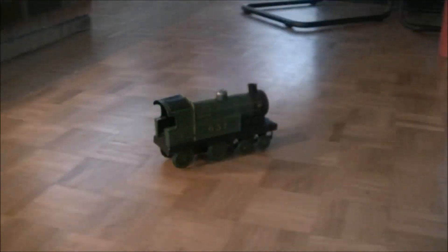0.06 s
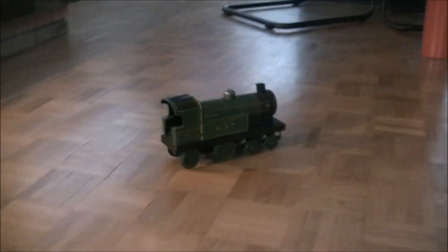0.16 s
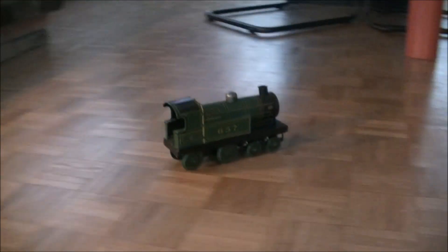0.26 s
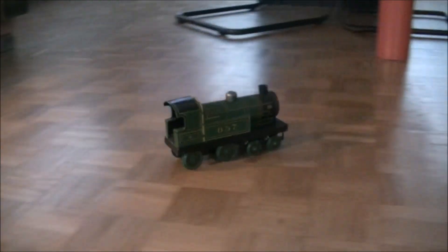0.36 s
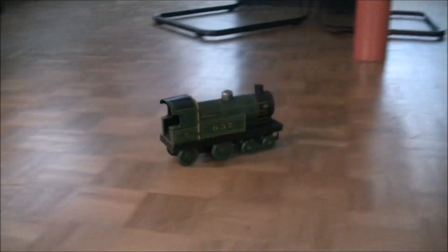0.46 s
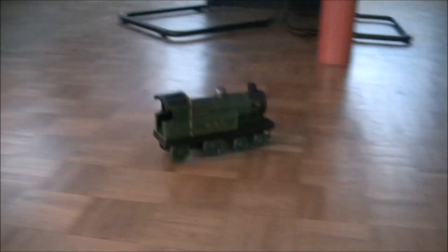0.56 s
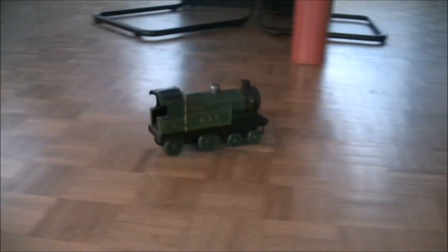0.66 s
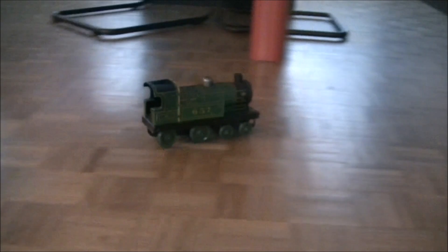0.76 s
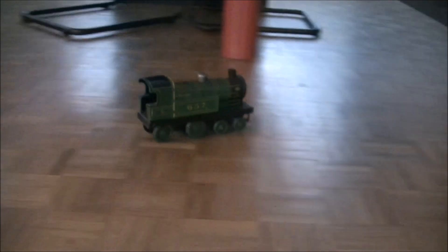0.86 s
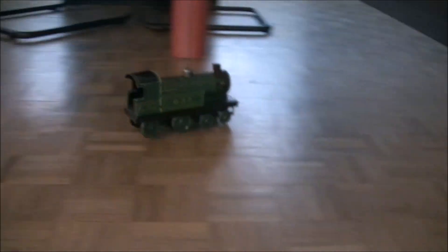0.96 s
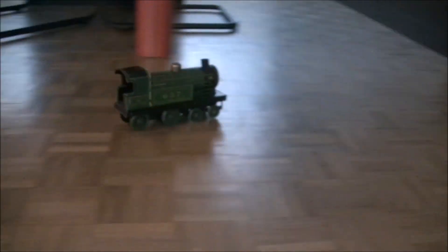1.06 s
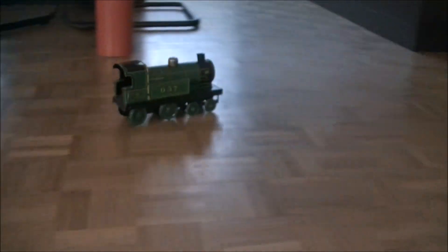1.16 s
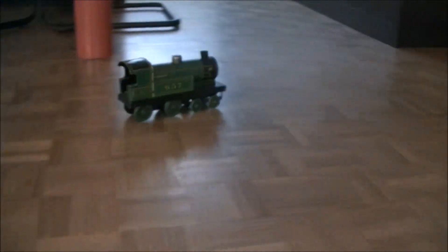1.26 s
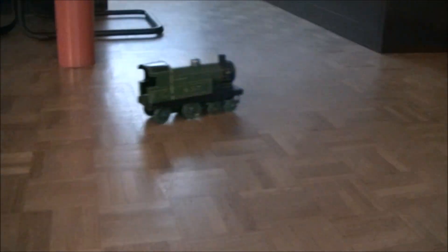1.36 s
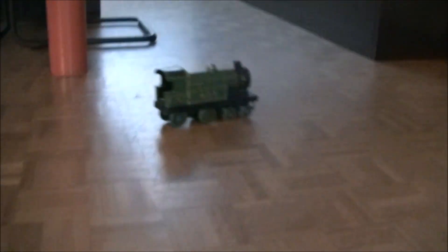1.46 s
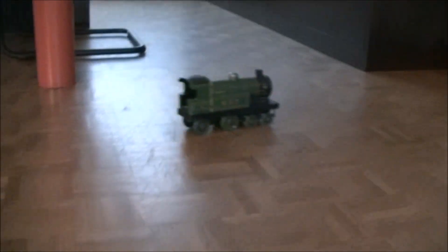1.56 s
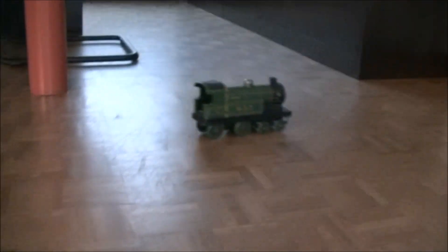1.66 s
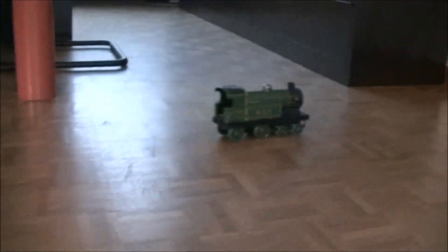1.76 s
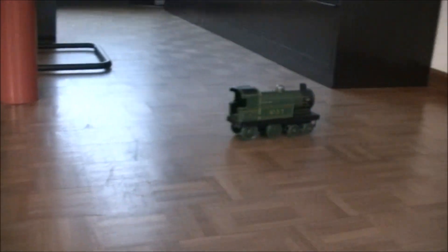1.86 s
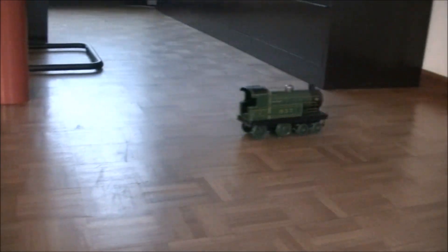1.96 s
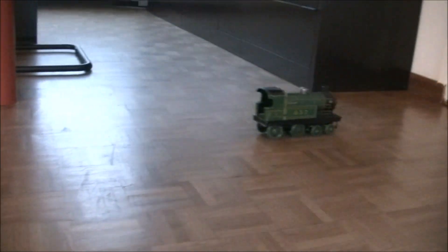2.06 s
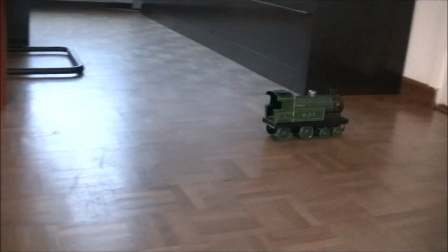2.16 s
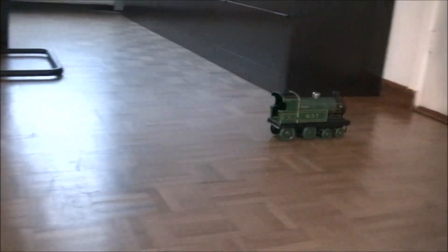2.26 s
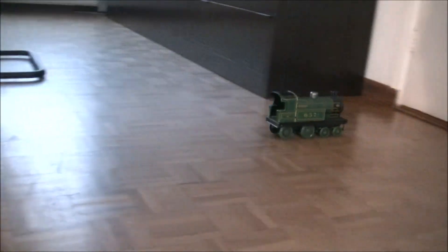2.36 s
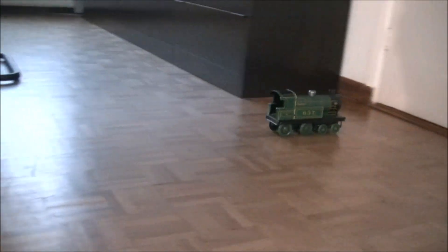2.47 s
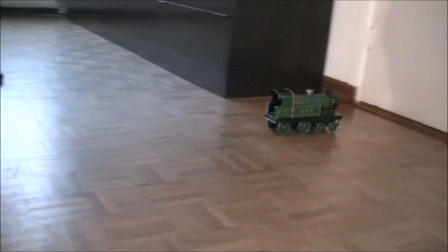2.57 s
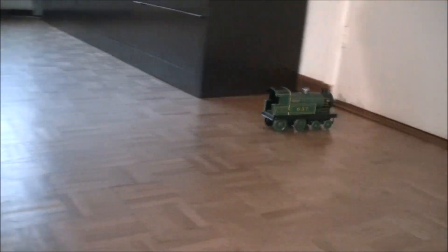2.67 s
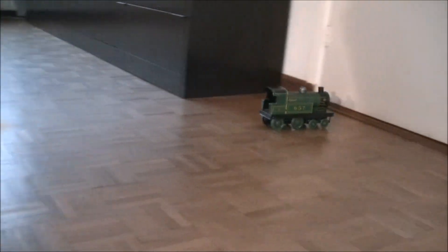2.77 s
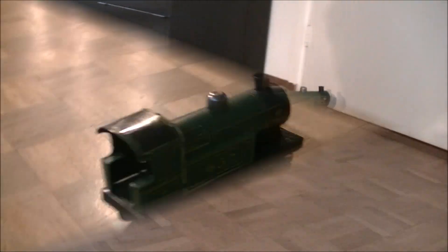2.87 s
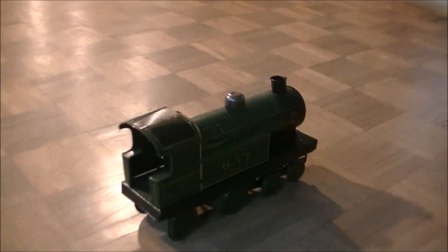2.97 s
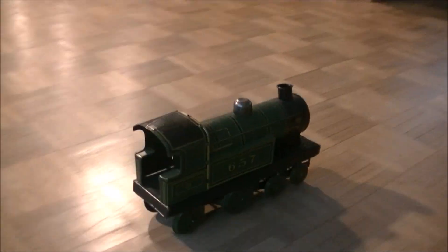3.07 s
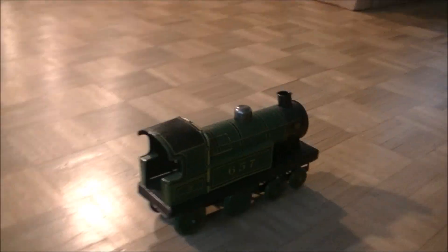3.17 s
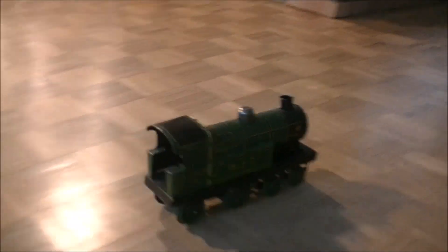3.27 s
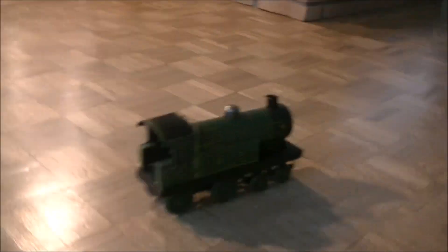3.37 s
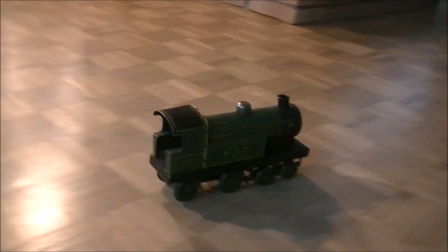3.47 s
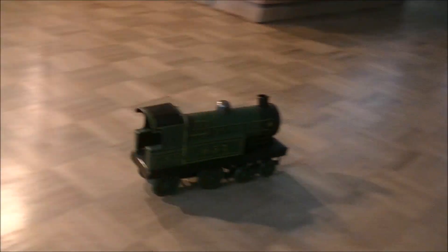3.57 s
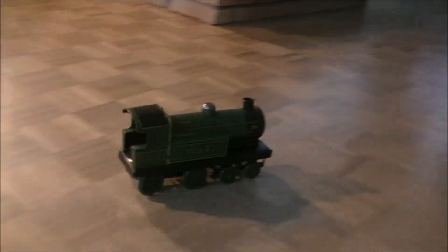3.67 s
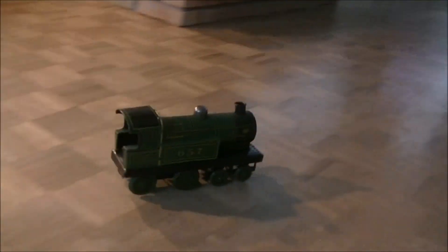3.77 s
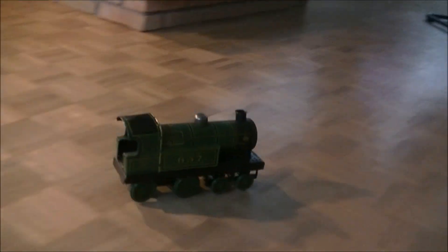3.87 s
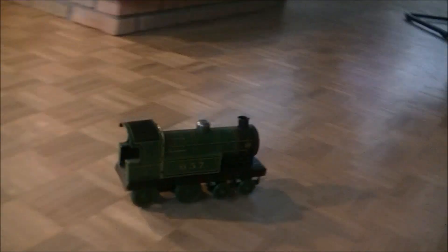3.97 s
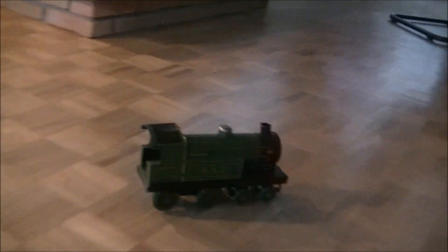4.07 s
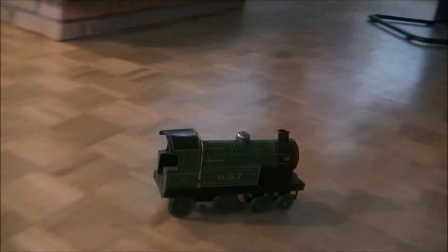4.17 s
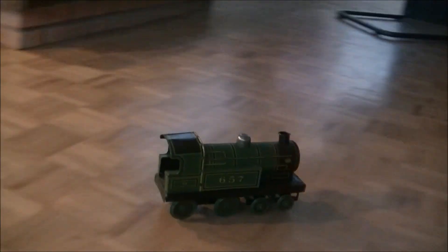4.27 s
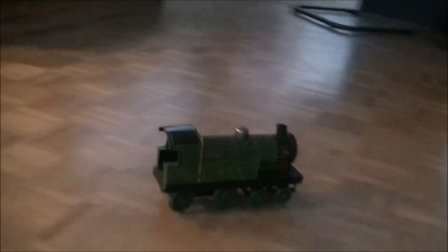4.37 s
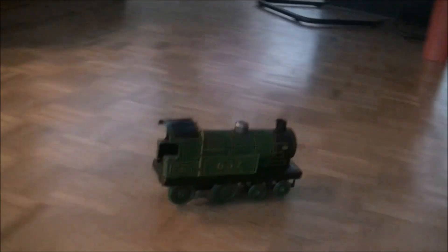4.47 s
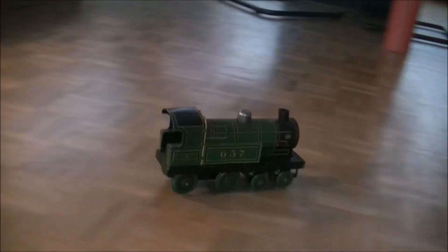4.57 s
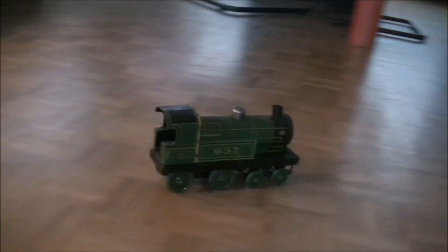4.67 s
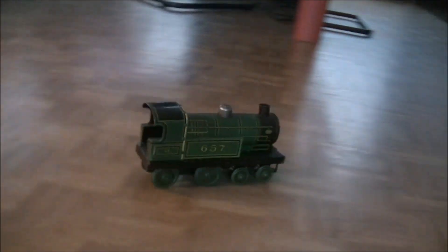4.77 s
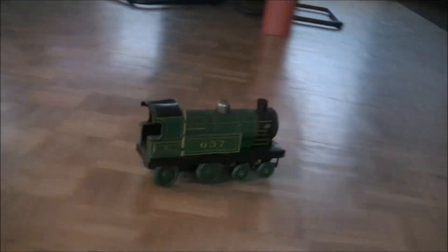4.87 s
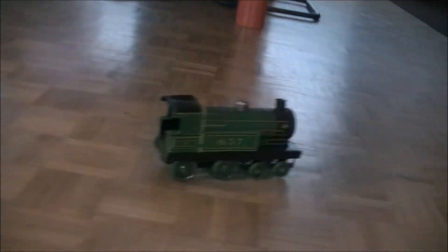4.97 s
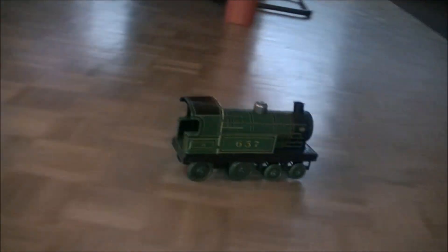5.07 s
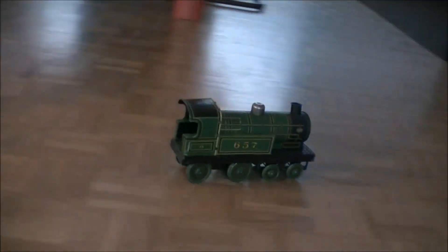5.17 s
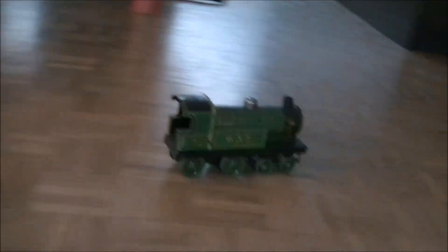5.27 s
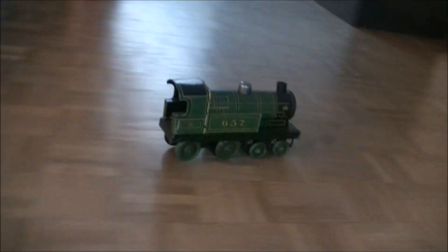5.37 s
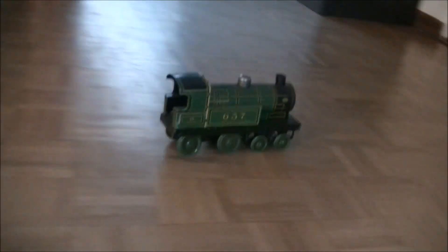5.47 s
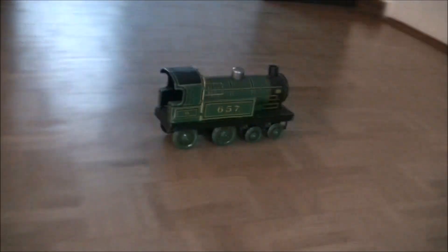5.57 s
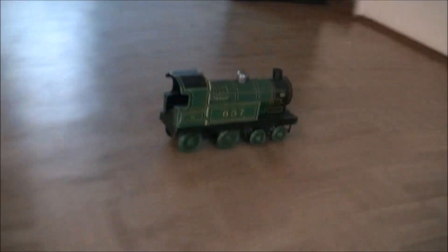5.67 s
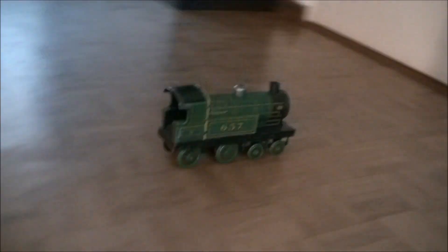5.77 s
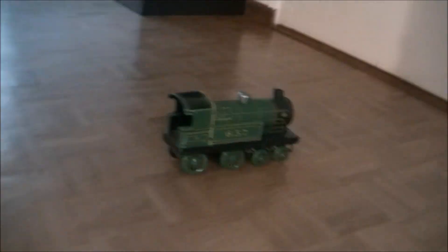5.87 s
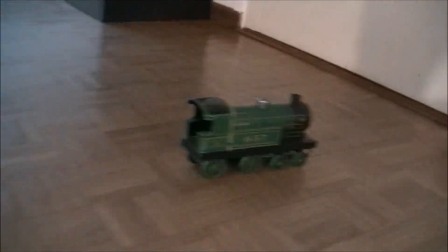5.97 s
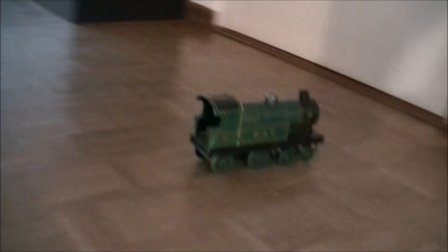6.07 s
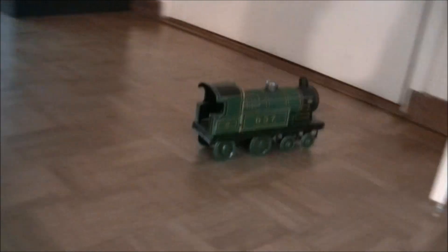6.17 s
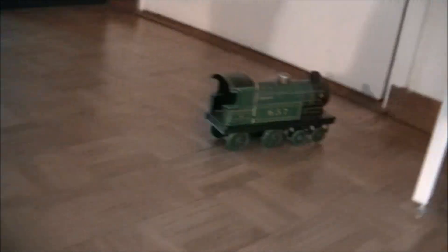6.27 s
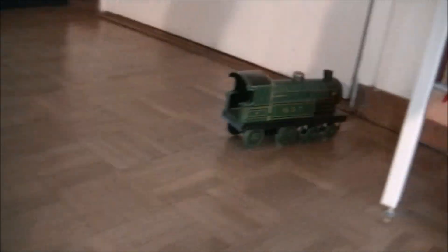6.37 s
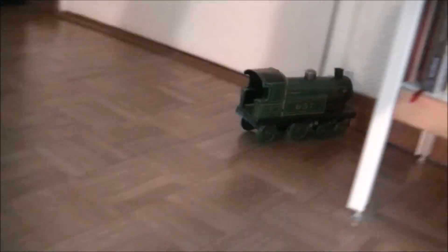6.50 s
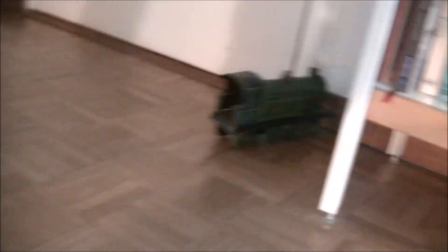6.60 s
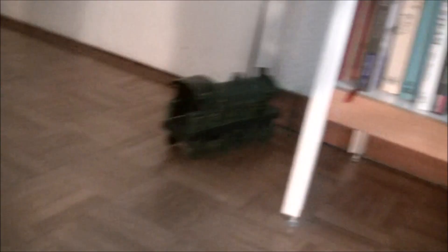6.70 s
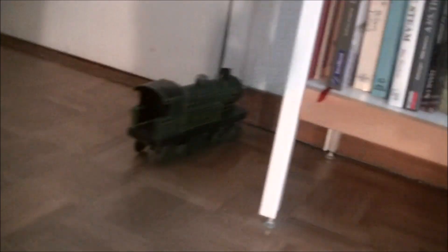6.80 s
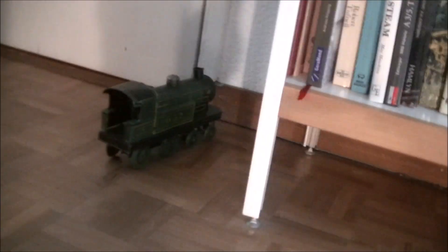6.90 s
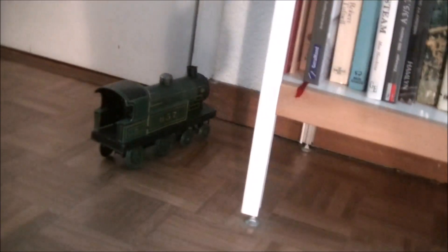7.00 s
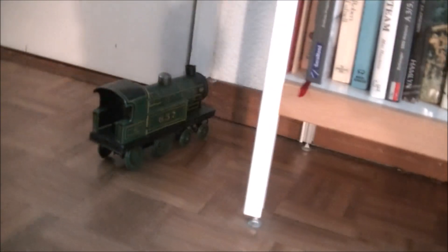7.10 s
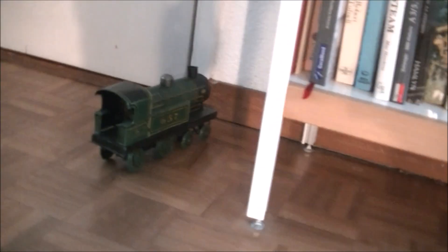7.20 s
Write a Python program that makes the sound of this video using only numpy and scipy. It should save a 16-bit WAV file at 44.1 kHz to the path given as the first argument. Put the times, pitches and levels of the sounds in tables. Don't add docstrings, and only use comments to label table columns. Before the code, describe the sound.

A clockwork tin locomotive runs over parquet in a lively room, its gears chattering brightly in the metal shell, with light wheel rumble and about five short squeaks per second. Around three seconds an abrupt cut starts a second run with softer squeaks. It hits the skirting board, rattles and stalls, leaving quiet room tone. A handheld stereo microphone follows closely, with finger taps on its body.

```python
import sys
import numpy as np
from scipy import signal
from scipy.fft import rfft, irfft, next_fast_len
from scipy.io import wavfile

SR = 44100
rng = np.random.default_rng(int(sys.argv[2]) if len(sys.argv) > 2 else 0)


def ratio(d):
    e = np.asarray(d, float) / 20
    return 10 ** e


def generate_wav(sig):
    pcm = np.round(np.clip(np.atleast_2d(sig).T, -1, 1) * 32767).astype(np.int16)
    wavfile.write(sys.argv[1], SR, pcm)


N = 319275
T = np.arange(N) / SR

# time_s, gear_db, wheel_load_db, shell_ring_db
RUN_EFFORT = [
    [(0.02, -31, -36, 1), (.5, -30, -37, 1), (.9, -30.5, -37.5, -1.5), (1.4, -32.5, -38.5, 1),
     (1.8, -31.5, -37.5, 2.5), (2.1, -32, -40, 0), (2.6, -34.5, -39, 1.5), (2.95, -31, -39, 2.5),
     (3.08, -27, -30, -5)],
    [(3.1, -37.5, -53.5, 3), (3.45, -31.5, -51.5, -5), (3.85, -34.5, -51, 3), (4.15, -28, -47.5, -2),
     (5.0, -28, -45, -4), (5.15, -26.5, -39.5, -3), (5.9, -28, -43, -0.5), (6.5, -26, -39.5, 0.5),
     (6.62, -26.5, -41, -19)],
]
SCENE_CHANGE_S = 3.0935
# start_s, end_s
STALL_S = [6.696, 6.745]

# freq_hz, density_db_per_hz
GEAR_COLOUR = [(1000, -25.5), (1800, -6), (2700, -4.5), (3600, -3.5), (4600, 0.5), (5400, 1), (6000, -13),
               (7000, -22), (8500, -13), (9500, -19.5), (12500, -31.5), (14000, -34), (16000, -28.5)]
# freq_hz, width_hz, level_db
SHELL_MODES = [(1920, 100, -5.5), (3650, 157, -8), (3520, 290, -24), (3700, 210, -12), (4250, 110, -12),
               (4570, 220, -5), (5100, 74, -18), (4820, 210, -9.5), (5326, 86, 4), (5160, 86, -13.5),
               (7745, 100, -9), (8350, 96, -6.5), (8060, 1000, -26.5), (11330, 200, -20), (12600, 120, -23)]
# freq_hz, density_db_per_hz
WHEEL_COLOUR = [(250, -27), (500, -11.5), (750, -4.5), (1200, 1.5), (1700, -0.5), (2300, -0.5),
                (3500, -31.5)]
GEAR_MID_DB, RATTLE_DB = -30.5, -42.5
RATTLE_DB_PER_GEAR_DB, RATTLE_DB_PER_RING_DB = 1.1, 0.39
MESH_DB, MESH_TURN, FLICKER_DB = 0.8, 0.827, 1.1

# middle_s, level_db, length_s, whine_db
FIRST_SQUEAKS = [(.122, -23, .051, -43), (.323, -24, 0.042, -46), (.513, -22, 0.053, -42),
                 (.702, -24, 0.05, -48), (.888, -22.5, 0.04, -35.5), (1.076, -24.5, 0.038, -40),
                 (1.263, -20, 0.047, -46), (1.45, -22, 0.046, -55), (1.642, -26.5, 0.052, -40),
                 (1.835, -23, 0.051, -47), (2.024, -24, 0.046, -46), (2.219, -24, 0.048, -34.5),
                 (2.417, -26.5, .052, -46), (2.623, -25, 0.048, -51), (2.836, -22.5, 0.036, -46),
                 (3.051, -23.5, 0.059, -37)]
# middle_s, level_db, length_s, whine_db
SECOND_SQUEAKS = [(3.343, -29, .042, -46), (3.558, -27.5, 0.045, -65), (3.757, -29.5, 0.041, -42),
                  (3.941, -27.5, .046, -69), (4.123, -29.5, .041, -52), (4.289, -30.5, 0.061, -42.5),
                  (4.456, -36, .05, -53), (4.612, -33, 0.074, -47), (4.758, -27.5, .046, -45),
                  (4.914, -27.5, 0.03, -37), (5.053, -26.5, 0.029, -35), (5.202, -31, 0.051, -39),
                  (5.349, -29.5, 0.051, -36.5), (5.492, -29.5, 0.041, -38.5), (5.637, -30.5, 0.066, -43),
                  (5.769, -26.5, .04, -43), (5.915, -30, 0.051, -44), (6.063, -24.5, 0.041, -47),
                  (6.195, -27, 0.02, -37), (6.349, -28, 0.059, -42), (6.491, -24.5, 0.046, -57),
                  (6.63, -34, 0.0293, -39.5)]
SQUEAKS = [FIRST_SQUEAKS, SECOND_SQUEAKS]
SQUEAK_HZ, SQUEAK_HZ_PER_TURN_PER_S, MID_TURNS_PER_S = 1954, 13.5, 5.3
WHINE_LAG_TURN, WHINE_LENGTH_S, WHINE_SAG_HZ = .4, 0.06534, 4.5

# start_s, peak_db, ring_hz
TOOTH_SLIPS = [(0.2188, -20, 5420), (.4396, -35, 5330), (.6794, -27, 5500), (.877, -19.5, 4780),
               (1.5354, -17.5, 5310), (1.737, -18, 5390), (1.9445, -18.5, 3760), (2.0343, -16, 5340),
               (2.087, -20, 5340), (2.228, -20.5, 3650), (2.428, -17, 5310), (2.4495, -16.5, 5320),
               (2.6356, -17, 5330), (2.7506, -18, 5310), (2.9085, -23, 5250), (3.0795, -10, 5200),
               (3.161, -20, 5270), (3.192, -31, 5470), (3.214, -18.5, 5170), (3.3058, -21, 5310),
               (4.0155, -25, 5240), (4.048, -19.5, 4770), (4.7324, -18, 5310), (5.1841, -15, 4750),
               (5.239, -15, 4840), (5.8626, -15.5, 5400), (6.19, -13, 5420), (6.4512, -12, 5310),
               (6.526, -18, 5310), (6.572, -14, 4520)]
# start_s, peak_db, jangle_s
BOARD_BLOWS = [(3.08, -16, .005), (3.083, -14.5, 0.0054), (3.091, -13, 0.0012), (4.863, -11.5, .0004),
               (6.572, -11, 0.001), (6.575, -7, 0.0028), (6.577, -22.5, 0.022), (6.6054, -11, 0.00025),
               (6.611, -18.5, 0.044), (6.639, -15.5, 0.0022), (6.646, -24, 0.025), (6.679, -27.5, 0.022),
               (6.71, -29, 0.026)]
# freq_hz, width_hz, level_db
FRONT_MODES = [
    (1460, 110, -16.5),
    (2520, 260, -6),
    (3330, 220, -1.5),
    (3740, 400, -2),
    (4210, 790, 9),
    (5310, 200, -19),
    (8740, 5600, -28),
]

# start_s, peak_db, push_s
FINGER_TAPS = [(.178, -20.5, 0.0012), (0.243, -23.5, 0.001), (.292, -52, 0.0024), (0.361, -28, 0.002),
               (0.368, -35, 0.0023), (.389, -29, 0.0023), (.679, -37, 0.003), (0.823, -31, 0.0017),
               (1.627, -37, 0.0025), (2.759, -38, 0.0028), (3.653, -63, 0.0035), (4.09, -50, 0.0049),
               (4.865, -21.5, 0.0016), (5.226, -22.5, 0.0015), (5.269, -25.5, 0.0011), (6.388, -32, 0.0017)]
# freq_hz, width_hz, level_db
THUD_MODES = [(171, 52, -2), (255, 95, -1), (353, 84, -0.5), (408, 56, -19), (840, 9.7, -19),
              (1330, 400, 1)]
THUD_S, THUD_DB = 6.951, -66.5

# time_s, gain_db
AIR_GAIN = [
    (0, 3),
    (.5, 4),
    (6.6, -7),
    (6.75, 17),
    (6.93, 18),
    (7.05, 30),
    (7.24, 27),
]
# freq_hz, density_db_per_hz
TONE_COLOUR = [(20, -19), (45, -13), (70, -9.5), (160, 3.5), (300, 3), (500, 1), (1000, -24), (4000, -17),
               (16000, -25)]
# freq_hz, level_db
HUM_PARTIALS = [(59.2, 2.5), (118.4, -5), (856, -11)]
HUM_DB, TONE_DB = -88, -65.5
TONE_GAIN_SHARE = 0.062

# freq_hz, t60_s
ROOM_DECAY = [(150, 0.36), (700, 0.71), (2000, 0.65), (5000, 0.65), (11000, 0.48)]
# freq_hz, side_minus_mid_db
ROOM_SIDE = [(60, -15), (110, -8), (200, -9), (380, -32), (700, -20), (1290, -13.5), (2380, -5.5),
             (4400, -9), (8120, -2.5), (15000, 3.5)]
# freq_hz, left_minus_right_db
PORT_LEAN = [(60, 0), (900, 0), (1400, 1), (1950, 4.5), (2600, -.5), (4400, -2), (8000, -1.8), (12000, 0)]
# freq_hz, left_lead_rad
PORT_LEAD = [(0, 0), (1640, 0.0), (2930, -0.89), (4220, -0.23), (7750, -1.25), (8010, -1.1), (8530, -0.5),
             (9470, -0.27), (10100, -0.61), (13900, 0.1), (14400, 0.21), (14600, -0.83), (15400, 0.2),
             (16300, -0.1)]
EDGE_HZ = 15850


def evened(x):
    return x / np.sqrt(np.mean(x ** 2) + 1e-20)


def read(points, hz):
    f, value = np.transpose(points)
    return np.interp(np.log(hz + 1), np.log(f + 1), value)


def add(mix, start_s, sound):
    part = mix[round(start_s * SR):][:len(sound)]
    part += sound[:len(part)]


def ring(x, hz, width_hz):
    r = np.exp(-np.pi * width_hz / SR)
    return signal.lfilter([.5, 0, -.5], [1, -2 * r * np.cos(2 * np.pi * hz / SR), r * r], x)


def colour(x, points):
    log_gain = np.log(ratio(read(points, abs(np.fft.fftfreq(4096, 1 / SR)))))
    taps = np.fft.ifft(np.exp(np.conj(signal.hilbert(log_gain)))).real[:2048]
    return signal.oaconvolve(x, taps)[:len(x)]


def drift(rate_hz):
    size = 2 ** 19
    hz = np.fft.rfftfreq(size, 1 / SR)
    spectrum = rfft(rng.standard_normal(size)) / (1 + (hz / rate_hz) ** 2)
    return evened(irfft(spectrum)[:N])


def clicks(per_s, spread_db, clump_db):
    size = ratio(spread_db * np.minimum(rng.exponential(1, N), 5) + clump_db * drift(37))
    sign = rng.choice([-1., 1.], N)
    return evened(size * sign * (rng.random(N) < per_s / SR))


def gears(ring_db):
    teeth = clicks(2000, 0.98, 2.32)
    shell = np.zeros(N)
    for hz, width_hz, db in SHELL_MODES:
        strikes = teeth * (rng.random(N) < .2) * ratio(2.5 * drift(18))
        shell += ratio(db) * np.sqrt(width_hz) * evened(ring(strikes, hz, width_hz))
    whole = evened(colour(teeth, GEAR_COLOUR)) + ratio(ring_db + 1.0) * evened(shell)
    bright = signal.sosfiltfilt(signal.butter(4, 6700, "high", fs=SR, output="sos"), whole)
    hiss = colour(rng.standard_normal(N), GEAR_COLOUR)
    hiss = signal.sosfilt(signal.butter(2, 7500, "high", fs=SR, output="sos"), hiss)
    return evened(whole - bright), evened(evened(bright) + ratio(-4) * evened(hiss))


def wheels():
    return evened(colour(clicks(1500, 1.0, 1.7), WHEEL_COLOUR))


def stick_slip(length_s, top_hz, arch, rise, fall, beat):
    u = np.linspace(-1.7, 1.7, round(1.7 * length_s * SR))
    bend_hz = np.where(u < 0, 40 + 35 * rise, 60 + 35 * fall)
    dip_hz = bend_hz * np.minimum(abs(u) ** 4, 2.2) * arch
    grip = 1 / (1 + abs(u / 1.03) ** np.where(u < 0, 7, 5.5))
    grip = grip * signal.windows.tukey(len(u), .2)
    flutter = 1 + 0.23 * np.sin(6.75 * u + 2 * np.pi * beat)
    return grip * flutter * np.sin(2 * np.pi * np.cumsum(top_hz + 8 - dip_hz) / SR)


def squeaks():
    out = np.zeros(N)
    for rows in SQUEAKS:
        turn_s = np.gradient(np.transpose(rows)[0])
        chances = rng.random((len(rows), 3))
        for (middle_s, db, length_s, whine_db), period_s, chance in zip(rows, turn_s, chances):
            hz = SQUEAK_HZ + SQUEAK_HZ_PER_TURN_PER_S * (1 / period_s - MID_TURNS_PER_S)
            squeak = ratio(db) * stick_slip(length_s, hz, 1, *chance)
            whine = ratio(whine_db) * stick_slip(WHINE_LENGTH_S, hz - WHINE_SAG_HZ, 0, *chance)
            add(out, middle_s - len(squeak) / SR / 2, squeak)
            add(out, middle_s + WHINE_LAG_TURN * period_s - len(whine) / SR / 2, whine)
    return out * ratio(.8 * drift(60))


def tooth_slips():
    out, t = np.zeros(N), T[:3000]
    for start_s, db, hz in TOOTH_SLIPS:
        split, lag = rng.random(2)
        neighbour = np.sin(2 * np.pi * (hz * (.95 + .1 * split) * t + lag))
        pair = np.sin(2 * np.pi * hz * t) + .7 * neighbour
        add(out, start_s, ratio(db - 2.5 - 60 * t / 0.052) * pair * np.minimum(t / 0.0036, 1))
    return out


def board_blows():
    blows, t = np.zeros(N), T[:3000]
    for start_s, db, jangle_s in BOARD_BLOWS:
        jolt = rng.standard_normal(len(t)) + 4.8 * (t == 0)
        add(blows, start_s, ratio(db) * jolt * np.exp(-t / jangle_s))
    return ratio(-25.5) * sum(ratio(db) * ring(blows, hz, width_hz) for hz, width_hz, db in FRONT_MODES)


def thud():
    puff, t = np.zeros(N), T[:6000]
    swell = np.minimum(t / 0.0071, 1) * np.exp(-t / 0.072)
    add(puff, THUD_S, rng.standard_normal(len(t)) * swell)
    return ratio(THUD_DB) * sum(ratio(db) * ring(puff, hz, width_hz) for hz, width_hz, db in THUD_MODES)


def finger_taps():
    out = np.zeros(N)
    for start_s, db, push_s in FINGER_TAPS:
        u = T[:2000] / push_s
        add(out, start_s, ratio(db - 3.0) * np.sin(np.pi * u) * np.exp(-1.2 * u))
    return out


def air():
    gain_db = np.interp(T, *np.transpose(AIR_GAIN))
    a, b = (evened(colour(rng.standard_normal(N), TONE_COLOUR)) for _ in range(2))
    hum = sum(ratio(db + 2.6 * drift(6.5)) * np.sin(2 * np.pi * hz * T) for hz, db in HUM_PARTIALS)
    tone_db = TONE_DB + TONE_GAIN_SHARE * gain_db + 4.7 * drift(2.5)
    tone = ratio(tone_db) * np.array([a + 0.35 * b, a - 0.26 * b])
    return tone + ratio(HUM_DB + gain_db) * hum


def tail():
    echoes = np.zeros((2, 36000))
    at = np.arange(200, 35980, 20) + rng.integers(0, 20, (2, 1789))
    np.put_along_axis(echoes, at, rng.choice([-1., 1.], at.shape), 1)
    hz, t, z = signal.stft(echoes, SR, nperseg=256)
    z = z * ratio(-60 * t / read(ROOM_DECAY, hz)[:, None])
    z[1] *= ratio(read(ROOM_SIDE, hz) - 0.5)[:, None]
    echoes = signal.istft(z, SR, nperseg=256)[1]
    return echoes / np.linalg.norm(echoes[0])


def room(x, send):
    turn = 2 * np.pi * 1.311 * T[:len(x)]
    mid, side = sum(signal.oaconvolve((send * share)[None], tail(), axes=1)[:, :len(x)]
                    for share in (np.cos(turn), np.sin(turn)))
    size = next_fast_len(len(x) + SR // 10)
    hz = np.fft.rfftfreq(size, 1 / SR)
    port = ratio(read(PORT_LEAN, hz) * .5) * np.exp(.6j * read(PORT_LEAD, hz))
    direct = irfft(rfft(x, size) * np.array([port, 1 / port]), size)[:, :len(x)]
    return direct + np.array([mid + side, mid - side])


def scene():
    time_s, *_, ring_db = np.vstack(RUN_EFFORT).T
    ring_db = np.interp(T, time_s, ring_db)
    chatter, bright = gears(ring_db)
    rumble = wheels()
    squeak = squeaks()
    knock = tooth_slips() + board_blows() + thud()
    passes_s = np.vstack(SQUEAKS)[:, 0]
    wheel_turn = np.interp(T, passes_s, np.arange(len(passes_s)))
    mesh_db = MESH_DB * np.cos(4 * np.pi * (wheel_turn - MESH_TURN))
    flicker_db = FLICKER_DB * drift(24)
    running = np.interp(T, STALL_S, [1, 0])
    cut, lead_in = round(SCENE_CHANGE_S * SR), SR // 2
    owned = (T < SCENE_CHANGE_S, T > SCENE_CHANGE_S)
    spans = (slice(0, cut), slice(cut - lead_in, N))
    runs = []
    for rows, own, span in zip(RUN_EFFORT, owned, spans):
        time_s, *columns, _ = np.transpose(rows)
        gear_db, load_db = (np.interp(T, time_s, column) for column in columns)
        rattle_db = RATTLE_DB + RATTLE_DB_PER_GEAR_DB * (gear_db - GEAR_MID_DB) + flicker_db
        rattle_db = rattle_db - RATTLE_DB_PER_RING_DB * np.maximum(ring_db, -8)
        train = ratio(gear_db + mesh_db) * chatter + ratio(rattle_db) * bright + ratio(load_db) * rumble
        train = ratio(-2.5) * train * running + knock * own
        send = ratio(-4.0) * train + ratio(-10) * squeak * own
        runs.append(room((train + squeak * own)[span], send[span]))
    return np.hstack([runs[0], runs[1][:, lead_in:]]) + finger_taps() + air()


def top_cut(x):
    return signal.sosfilt(signal.butter(12, 15830, fs=SR, output="sos"), x)


def record(dry):
    cut = signal.sosfilt(signal.butter(2, 45, "high", fs=SR, output="sos"), dry)
    low_pass = signal.firwin(511, EDGE_HZ, window=("kaiser", 9), fs=SR)
    mix = signal.oaconvolve(cut, low_pass[None], "same")
    return top_cut(mix)


dry = scene()
out = record(dry)
generate_wav(out)
```